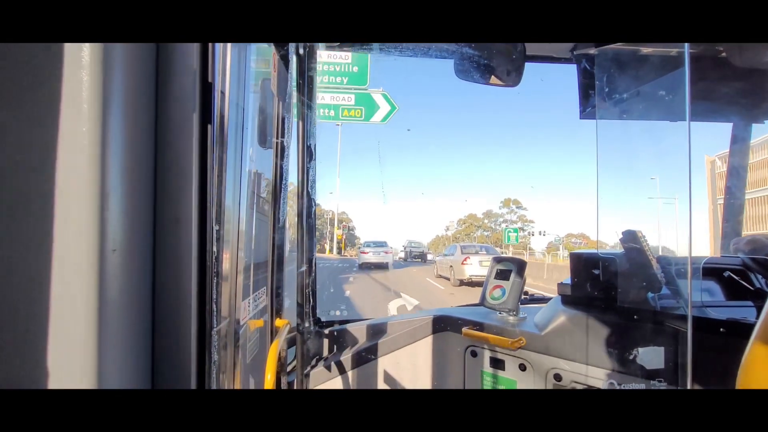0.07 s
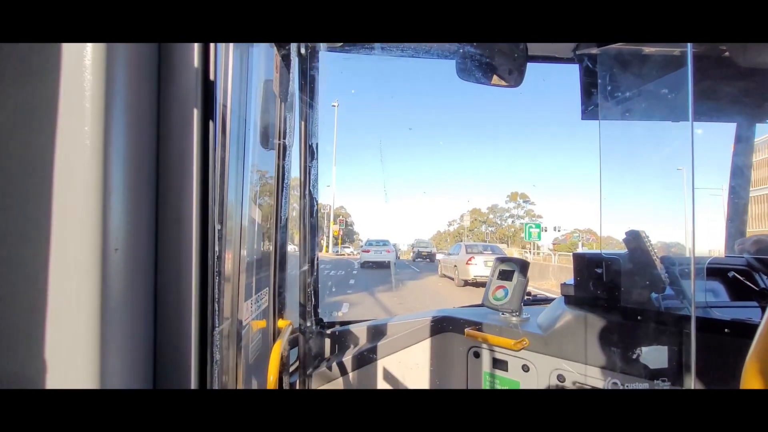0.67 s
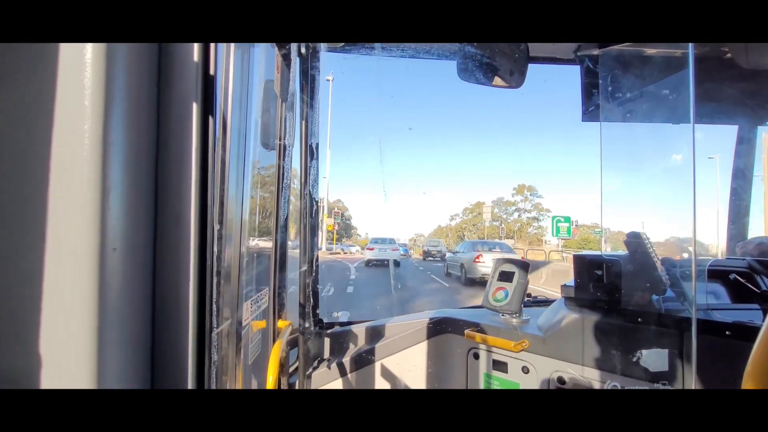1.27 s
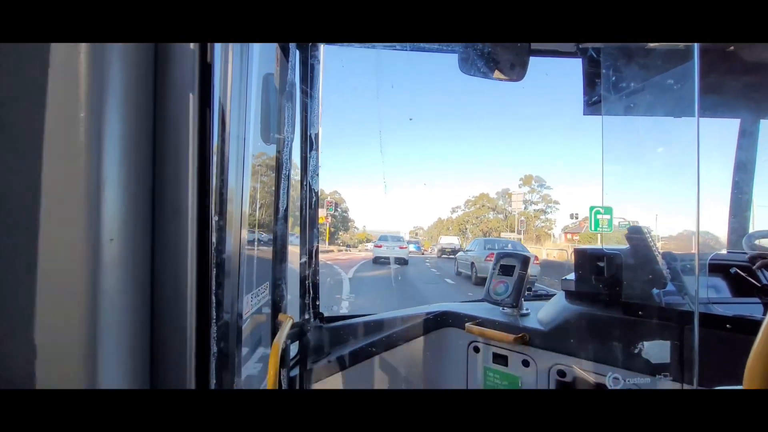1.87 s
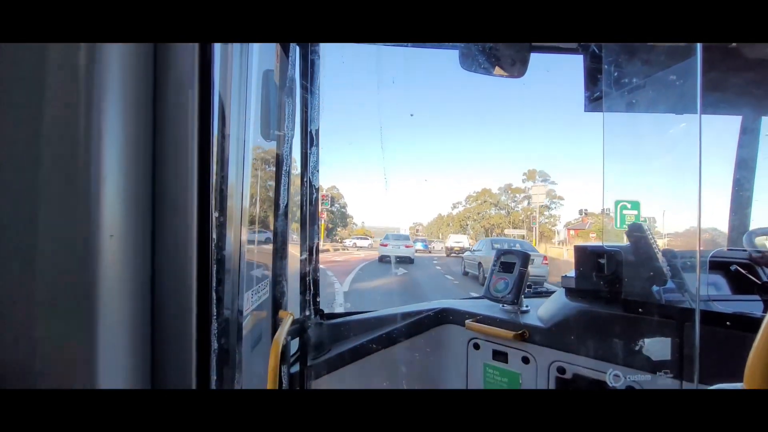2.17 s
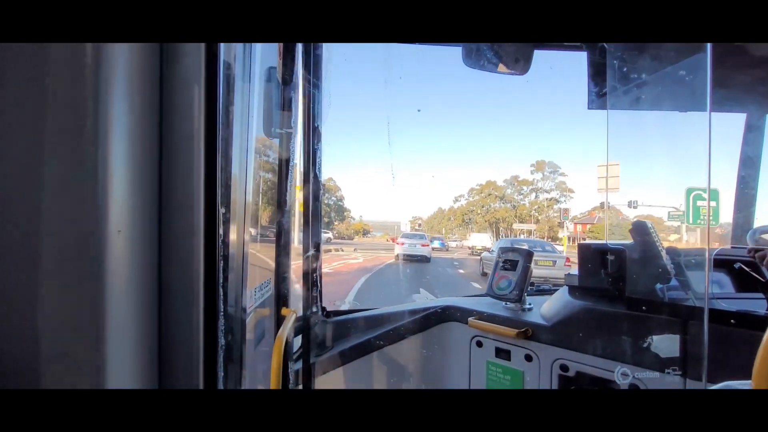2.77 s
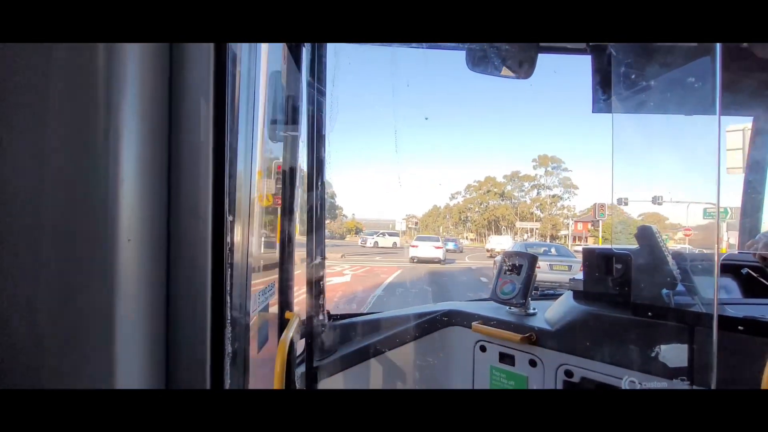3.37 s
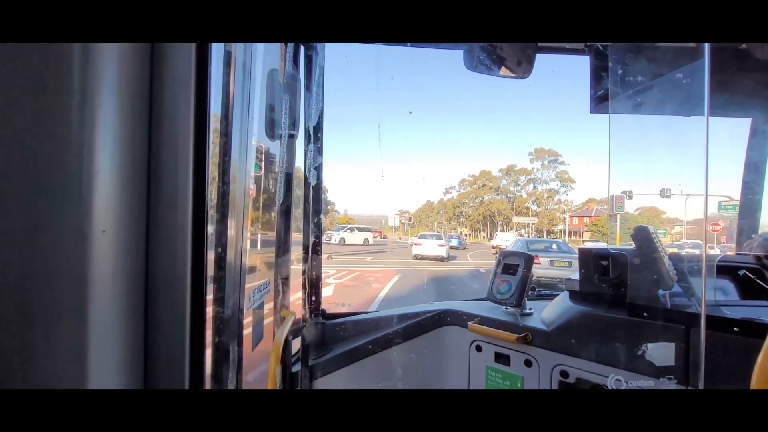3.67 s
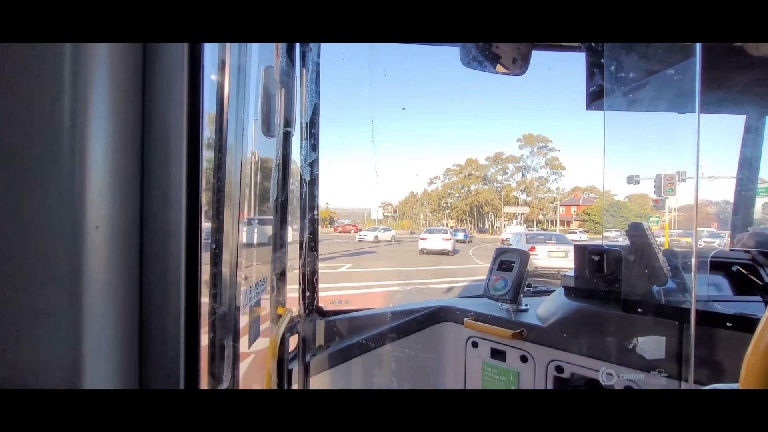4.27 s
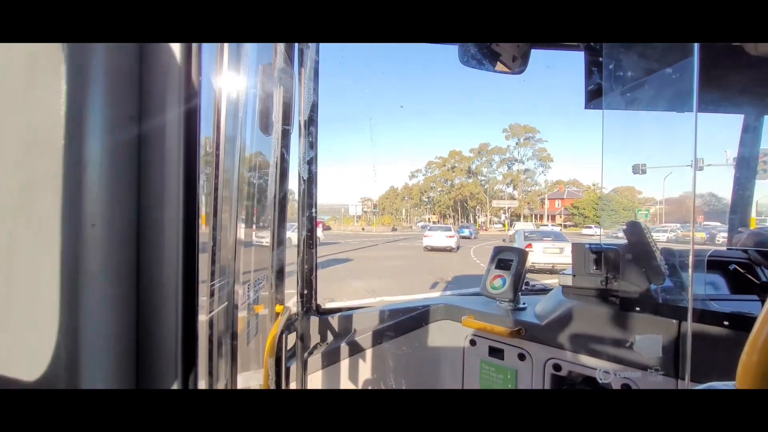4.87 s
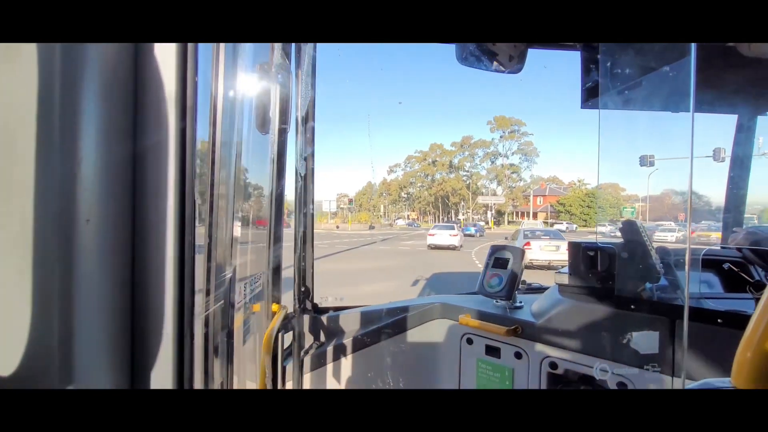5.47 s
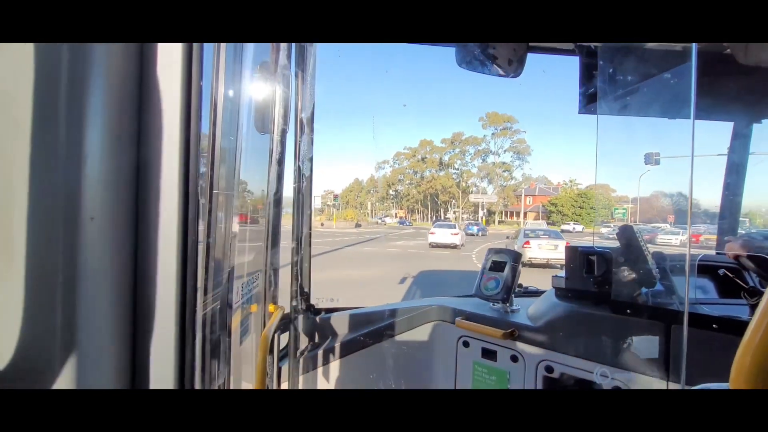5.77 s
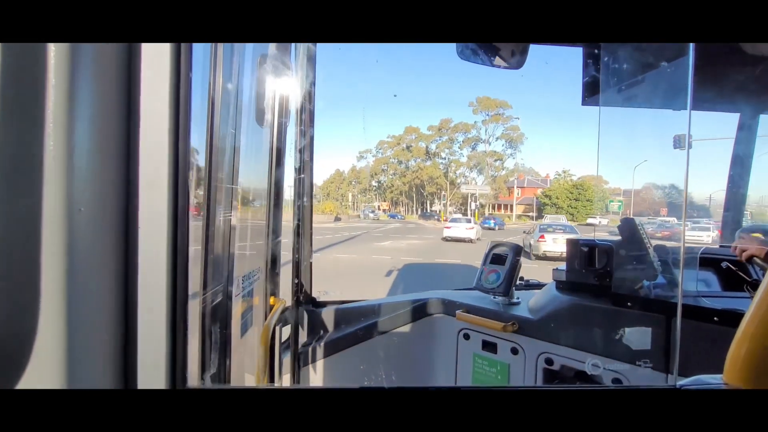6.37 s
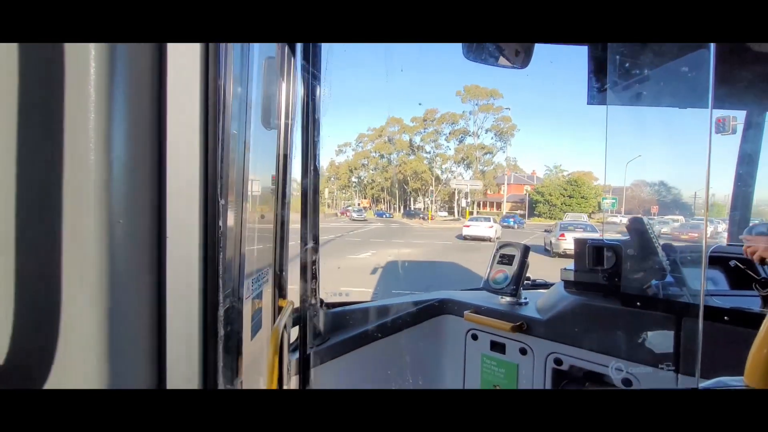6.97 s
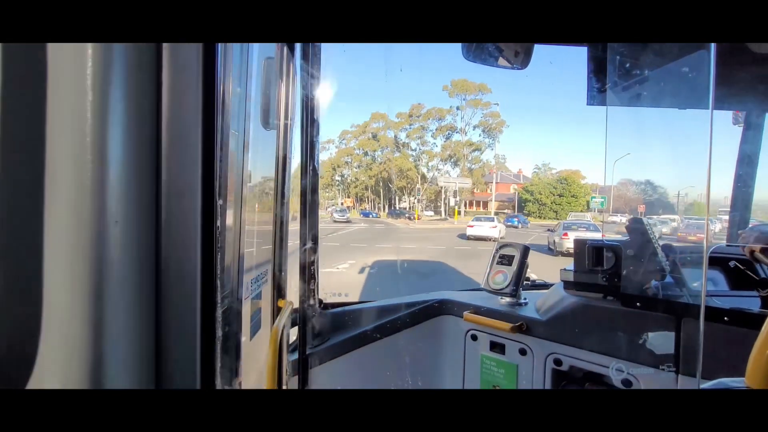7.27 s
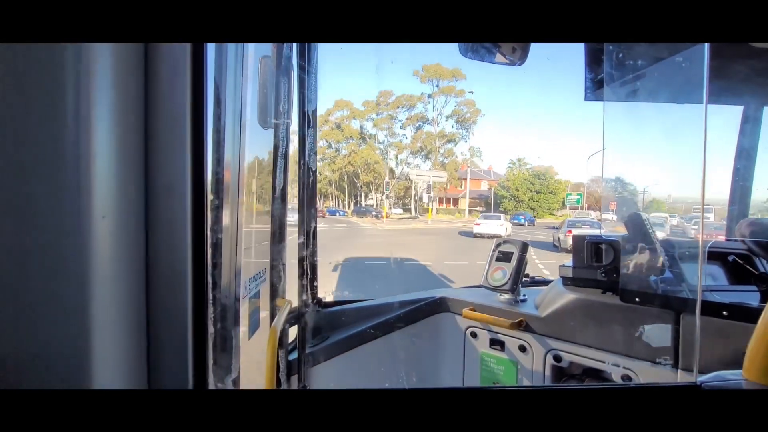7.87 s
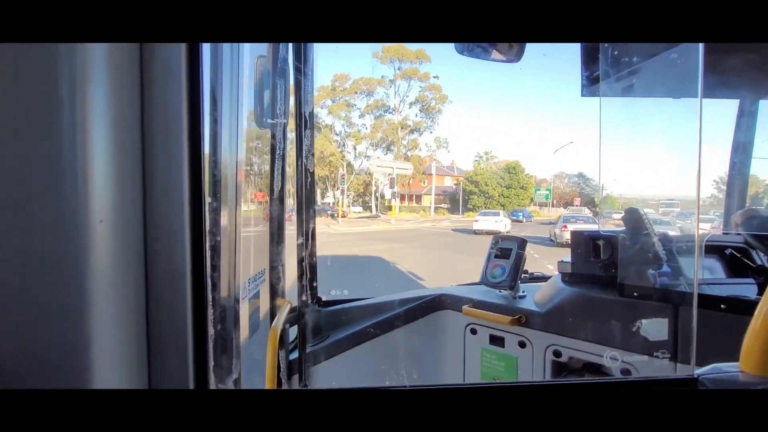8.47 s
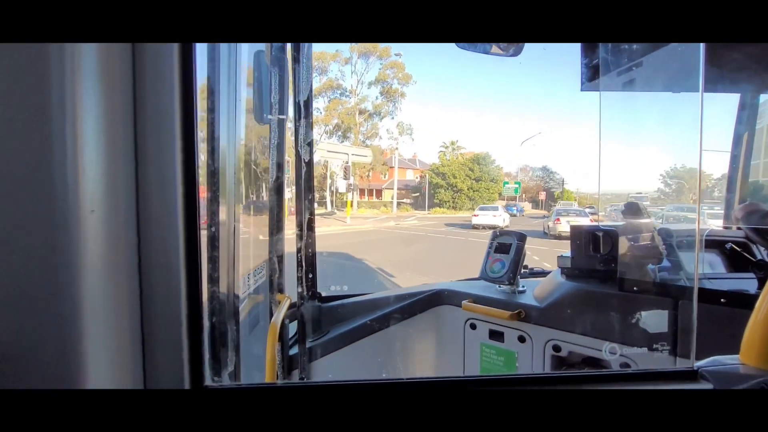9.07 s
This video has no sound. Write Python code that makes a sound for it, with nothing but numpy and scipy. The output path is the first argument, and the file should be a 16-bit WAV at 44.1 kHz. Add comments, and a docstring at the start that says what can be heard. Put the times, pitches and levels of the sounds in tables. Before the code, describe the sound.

A city bus is heard from its front seat in stereo for about nine seconds. A deep diesel drone and road rumble run throughout, with light gear whines and a faint fan hum. The engine drops in pitch during the first second or so, then sinks slowly, throbbing unevenly. A faint, high air hiss with a thin whistle fades over the first two seconds. Panels and fittings chatter lightly in flurries, and rubber seals give occasional tiny squeaks. Dull knocks and ticks come between 2.5 and 3.3 seconds. At 4 seconds, just after a low thump, the glazed door close by knocks sharply with a brief ring. At 5.8 seconds a jolt swells the rumble and a wall panel judders briefly. Thuds arrive around 7.9 seconds, and the door knocks again, slightly softer, at 8.5, followed by more thuds and rattling as the rumble continues.

```python
"""City bus, by the front door

Stereo microphone at the front seat, rolling through a junction. The diesel drones and throbs far behind,
its gears whining in step. The body thumps, and the road shakes it: rough patches swell the rumble and
set panels and fittings chattering. A wall panel judders; close by, the glazed door knocks sharply
twice. Seals squeak faintly, and at the start an air valve hisses away."""
import sys
import numpy as np
from scipy import signal
from scipy.fft import rfft, irfft, next_fast_len
from scipy.io import wavfile
from scipy.ndimage import uniform_filter1d, map_coordinates

SR = 44100
rng = np.random.default_rng(int(sys.argv[2]) if len(sys.argv) > 2 else 0)


def wav_out(sig):
    """Save sig, one row per channel (or a flat mono array), as 16-bit PCM at SR to the path in sys.argv[1]."""
    wavfile.write(sys.argv[1], SR, np.round(np.clip(np.atleast_2d(sig).T, -1, 1) * 32767).astype(np.int16))


N = 406602


def amp(db):
    """Decibels to gain."""
    return 10 ** (np.asarray(db) / 20)


def unit(x):
    """Scaled to rms 1."""
    return x / np.sqrt(np.mean(x ** 2) + 1e-20)


def along(points, hz):
    """Read (frequency, value) points on a log frequency axis."""
    freqs, values = np.transpose(points)
    return np.interp(np.log(hz + 1), np.log(freqs), values)


def curves(rows):
    """One value per sample for each column after the time."""
    times, *columns = np.transpose(rows)
    return [np.interp(np.arange(N) / SR, times, column) for column in columns]


def swells(rows, rise_s, fall_s):
    """Rows of (start, length, levels...) become one dB curve per level: each rises, holds and dies."""
    t = np.arange(N) / SR
    out = np.zeros((len(rows[0]) - 2, N))
    for start, length, *db in rows:
        rise = np.clip((t - start) / rise_s + .5, 0, 1)
        fall = np.exp(-np.maximum(t - start - length, 0) / fall_s)
        out += np.outer(db, rise * fall)
    return out


def wobble(rate):
    """A smooth random curve, rate knots a second."""
    return map_coordinates(rng.standard_normal(int(N * rate / SR) + 4), [np.arange(N) * rate / SR])


def filtered(x, response):
    """x through a complex response of frequency."""
    n = x.shape[-1]
    padded = next_fast_len(n + SR // 4)
    return irfft(rfft(x, padded) * response(np.fft.rfftfreq(padded, 1 / SR)), padded)[..., :n]


def add(track, start, sound):
    """Mix a sound into a track, start seconds in."""
    part = track[..., round(start * SR):][..., :sound.shape[-1]]
    part += sound[..., :part.shape[-1]]


def resonances(modes, hz):
    """Causal response of a part that rings in modes of f/Hz, width/Hz, level/dB."""
    return sum(amp(db) * 1j * hz * width / (centre ** 2 - hz ** 2 + 1j * hz * width)
               for centre, width, db in modes)


def contacts(rate, scatter_db):
    """Countless tiny collisions of uneven size, each a short stereo burst of noise."""
    energy = (rng.random(N) < rate / SR) * amp(scatter_db * rng.standard_normal(N)) ** 2
    decay = np.exp(-np.arange(SR // 20) / SR / 0.0088)
    envelope = np.sqrt(np.abs(signal.fftconvolve(energy, decay)[:N]))
    return unit(envelope * rng.standard_normal((2, N)))


def knock_noise(size, direct_share=0.39):
    """Noise of one contact: part of its power reaches both sides alike, the rest is scattered."""
    direct = np.sqrt(direct_share) * rng.standard_normal(size)
    return direct + np.sqrt(1 - direct_share) * rng.standard_normal((2, size))


def rasp(hz, scatter_hz, size, slips_per_s=1100):
    """A stereo tone whose pitch jumps with every slip: tight for a small scatter, hoarse for a wide one."""
    slips = np.arange(size) * slips_per_s / SR
    jumps = np.array([map_coordinates(rng.standard_normal(N // 20), [slips]) for _ in range(2)])
    return np.sqrt(2) * np.sin(2 * np.pi * np.cumsum(hz + scatter_hz * jumps, axis=1) / SR)


def tone(hz, db, flutter_db, drift_rad):
    """A rotating part's tone, unsteady in level and phase."""
    phase = 2 * np.pi * np.cumsum(hz * np.ones(N)) / SR + drift_rad * wobble(7.2)
    return np.sqrt(2) * amp(db + flutter_db * wobble(4.6)) * np.sin(phase)


# How alike the cabin's sound is at the two sides of the microphone: f/Hz, correlation
COHERENCE = [(60, 0.74), (130, 1), (290, 0.56), (640, 0.7), (1000, 0.15), (1500, -0.44), (2400, 0.092),
             (3500, -0.063), (7000, 0.014)]
def spread(pair, colour):
    """Two unrelated signals become a coloured cabin sound field of rms 1, nearly mono in the bass."""
    def mid_side(hz):
        angle = np.arccos(np.clip(along(COHERENCE, hz), -1, 1)) / 2
        return amp(along(colour, hz)) * np.array([np.cos(angle), np.sin(angle)])
    mid, side = filtered(pair, mid_side)
    return unit(np.array([mid + side, mid - side]))


# Decay of the passenger cabin: f/Hz, t60/s
CABIN_DECAY = [(200, 0.94), (2000, 0.22), (5000, 0.28), (12000, 0.12)]
def cabin(x):
    """The cabin's short reverberation, one tail for each side."""
    hz, t, spectrum = signal.stft(rng.standard_normal((2, SR // 2)), SR, nperseg=256)
    decay = amp(-60 * t / along(CABIN_DECAY, hz)[:, None])
    tail = signal.istft(spectrum * decay, SR, nperseg=256)[1]
    return signal.fftconvolve(x, tail / np.linalg.norm(tail[0]), axes=1)[:, :N]


# Bright spectrum of escaping air, shared by the buzzing trim: f/Hz, level/dB
SIZZLE_COLOUR = [(800, -50), (3000, -12), (6000, 0), (7300, 3), (8600, -3), (9900, 1.5), (12500, 1),
                 (15500, 0)]
def valve(whistle_hz=13500, hold_s=.4, sag_hz_per_s=2700):
    """Escaping air hisses and whistles thinly; the whistle sags and fades as the pressure drops."""
    t = np.arange(N) / SR
    hiss = amp(-56 - 9 * t) * spread(rng.standard_normal((2, N)), SIZZLE_COLOUR)
    emptying_s = np.maximum(t - hold_s, 0)
    pitch_hz = np.maximum(whistle_hz - sag_hz_per_s * emptying_s, whistle_hz / 2)
    return hiss + amp(-67.5 - 16 * emptying_s) * rasp(pitch_hz, scatter_hz=270, size=N)


# Rubber seals, faint at the seat: t/s, length/s, f/Hz, pitch scatter/Hz, level/dB
SEAL_RUBS = [(0.454, .12, 4300, 300, -53), (0.705, 0.062, 4250, 330, -52.5), (.87, 0.21, 6985, 350, -65),
             (1.05, 0.051, 4300, 260, -54), (1.186, 0.078, 4200, 272, -50), (1.22, .12, 5160, 500, -57),
             (1.929, .2, 4270, 220, -57), (2.14, 0.25, 5100, 480, -55.5), (2.42, .12, 2400, 260, -49.5),
             (2.6, .1, 4250, 300, -53), (3.09, 0.076, 4310, 300, -51), (3.89, 0.065, 10180, 330, -56),
             (4.717, .11, 4372, 250, -57), (5.368, 0.073, 4350, 280, -51), (6.39, .07, 13480, 400, -63),
             (7.148, .18, 7053, 400, -68), (7.293, 0.25, 4380, 219.9, -60.5),
             (8.245, 0.093, 4250, 250, -56)]
def squeaks():
    """Rubbing seals give short chirps, some tight and some hoarse, that stutter as they slip."""
    out = np.zeros((2, N))
    for start, length, hz, scatter_hz, db in SEAL_RUBS:
        n = int(length * SR)
        arch = np.sin(np.pi * np.arange(n) / n)
        add(out, start, amp(db) * rasp(hz, scatter_hz, size=n) * arch)
    return out * amp(2 * wobble(70))


# One loose fitting, dying down about four seconds in: t/s, level/dB
FITTING_LEVEL = [(0, -60), (2.7, -60), (3.5, -64), (4.2, -72)]
def fitting_buzz(firing_hz):
    """A loose fitting rings thinly, nudged by each firing of the engine."""
    nudge = 1 + .6 * np.sin(2 * np.pi * np.cumsum(firing_hz) / SR)
    level_db = curves(FITTING_LEVEL)[0] + 2 * wobble(15)
    return amp(level_db) * nudge * rasp(hz=2335, scatter_hz=85, size=N)


# Ventilation above the seat: f/Hz, level/dB
FAN_TONES = [(350, -52.5), (934, -61.5)]
def fan():
    """The spinning fan sings overhead, louder on the left."""
    hum = sum(tone(hz, db, flutter_db=3, drift_rad=0.81) for hz, db in FAN_TONES)
    return hum * amp([[0], [-7]])


# The diesel at the far end slows, then holds a low speed: t/s, firing rate/Hz, relative level/dB
ENGINE_RUN = [(0, 81.6, -40), (.25, 83.6, -36), (.5, 77, -43), (.8, 68.76, -23), (1.1, 63.04, -21.5),
              (1.6, 61.9, -29), (2.15, 60.56, -32), (2.55, 58.84, -15.5), (3, 58.33, -22),
              (3.5, 57.2, -20.5), (4.4, 55.36, -27), (5, 55.82, -20), (5.5, 56.13, -25), (6.05, 52, -22),
              (6.4, 49.38, -41), (7.3, 49.98, -29.5), (8.5, 50.64, -21), (9.22, 50.9, -41)]
def engine(firing_hz, drone_db):
    """The firing fundamental carries to the front of the bus, throbbing unevenly."""
    return tone(firing_hz, drone_db - 4, flutter_db=2, drift_rad=0.16)


# Whines heard through the body: start/s, end/s, multiple of the firing rate, relative level/dB
GEAR_WHINES = [(0, 1.7, 1.22, -30), (0, .35, 2.45, -34), (0, .35, 2.95, -32), (0, .55, 4.5, -32.5),
               (1.1, 2.5, 4.5, -33), (1.2, 2.4, 3.45, -35), (1.48, 1.65, 4.5, -36), (2.08, 2.26, 4.5, -31),
               (1.1, 3.3, 9, -49), (3.2, 5.5, 4.53, -37), (3.7, 5.7, 5, -38), (4.2, 5.2, 6.33, -46),
               (5.9, 8.9, 7.43, -37.5), (6.3, 9.22, 11.23, -45.5), (7.7, 9.22, 8.86, -40),
               (8.8, 9.22, 7.5, -41)]
def driveline(firing_hz):
    """Shaft and gear tones, locked to the engine's speed, each swell and fade."""
    out = np.zeros(N)
    firing_phase = 2 * np.pi * np.cumsum(firing_hz) / SR + .05 * wobble(14)
    for start, end, multiple, db in GEAR_WHINES:
        phase = multiple * firing_phase[round(start * SR):round(end * SR)]
        add(out, start, amp(db) * signal.windows.tukey(len(phase), .5) * np.sin(phase))
    flutter_db = 3.5 * wobble(14)
    return out * amp(flutter_db - 1.5)


# Shaking of the body, above that on the smoothest stretch: t/s, level/dB
ROAD_SHAKE = [(0, 7), (.9, 4), (1.65, 2.5), (2.3, 4), (2.75, 3.5), (3.05, 3), (3.55, 1.5), (4.5, 0),
              (5.25, 0), (5.8, 9.5), (6.15, 3.5), (7, 0.26), (7.7, 1.5), (8.15, 3.5), (8.6, 5.5), (8.95, 1),
              (9.22, 1.5)]
# What rough patches add: t/s, length/s, shake/dB, boom/dB, floor rumble/dB, tyre roar/dB
ROUGH_PATCHES = [(.08, 0.18, 0.5, -0.5, 1, -1), (1.17, 0.1, 3, 1.5, -0.5, -0.5),
                 (1.93, 0.25, 0.5, 0.5, 2, 1), (2.56, 0.21, 0.5, 0, 1.5, 2.5), (3.12, .13, 7.5, -6, 0, -1),
                 (3.88, 0.17, 4.5, -2, -1, 0.5), (4.76, 0.15, 1, 3.5, -1, 1),
                 (5.76, 0.089, -1, 1, 1.5, -0.5), (6.42, 0.18, 1, 4, 1, 0), (7.86, 0.18, -0.5, 4, 5.5, 3.5),
                 (8.14, 0.03, 4.5, -12, 0, 2), (8.38, 0.17, 4, 1.5, -2.5, 0), (8.67, .075, 2, 0, 0, 1.5),
                 (9.11, 0.11, 2.5, 7.5, 0.5, 1.5)]
def road_surface():
    """The road shakes the body; each rough patch adds a swell and shifts the balance of the rumble."""
    patch_db, boom_db, floor_db, roar_db = swells(ROUGH_PATCHES, rise_s=0.11, fall_s=0.034)
    return curves(ROAD_SHAKE)[0] + patch_db, boom_db, floor_db, roar_db


def rumble(colour, evenness):
    """Road noise through the body; damping by the suspension evens out its swells."""
    noise = spread(rng.standard_normal((2, N)), colour)
    power = np.abs(uniform_filter1d(np.mean(noise ** 2, axis=0), SR // 8)) + 1e-6
    return unit(noise / power ** (evenness / 2))


# Spectra at the seat of body sway, cabin boom, floor and tyres: f/Hz, level/dB
BODY_SWAY = [(8, -46), (24, -2), (33, 0), (42, 4), (52, -36), (80, -44), (300, -120)]
AIR_BOOM = [(15, -70), (38, -25.5), (52, 2.5), (66, 9.5), (80, 2.5), (95, 0), (120, -14), (170, -50),
            (600, -120)]
FLOOR_RUMBLE = [(30, -63), (80, -6), (122, 3.5), (158, 1), (187, -4), (218, -1), (285, -3), (325, -12),
                (380, -18), (600, -39), (2000, -120)]
TYRE_ROAR = [(80, -68), (260, -24), (355, 5.5), (400, -2.5), (450, -1), (510, -8), (640, -5), (800, -8),
             (1000, -14), (1350, -15.5), (2000, -28.5), (9000, -120)]
def road_noise(shake_db, boom_db, floor_db, roar_db):
    """The body sways, the air booms, the floor rumbles and the tyres roar, all growing with the shake."""
    sway = amp(-33 + 0.5 * shake_db) * rumble(BODY_SWAY, evenness=0.62)
    boom = amp(-28.5 + 0.85 * shake_db + boom_db) * rumble(AIR_BOOM, evenness=0.47)
    floor = amp(-31 + 0.9 * shake_db + floor_db) * rumble(FLOOR_RUMBLE, evenness=0.3)
    roar = amp(-40.5 + 0.95 * shake_db + roar_db) * rumble(TYRE_ROAR, evenness=0.14)
    return sway + boom + floor + roar


# Short low swells that fill the cabin: t/s, level/dB, f/Hz, rise/s
LOW_THROBS = [(0.42, -21.5, 35.5, 0.24), (1.511, -18, 65.9, 0.054), (1.646, -14, 64.6, 0.046),
              (1.934, -12.5, 64.5, 0.053), (2.293, -17, 64.46, .05), (2.566, -15, 62.7, .05),
              (2.65, -21.5, 35, 0.1), (2.885, -25, 65.6, 0.045), (3.122, -18, 63, 0.039),
              (3.13, -17, 37, 0.058), (3.315, -11, 60.05, .05), (3.441, -15, 61.33, 0.04),
              (3.838, -8.5, 62, 0.039), (5.17, -16, 60.56, 0.044), (5.322, -16, 59.3, 0.06),
              (5.469, -14, 62.3, 0.037), (5.827, -17, 67, .05), (7.868, -11.5, 68.3, 0.032),
              (8.256, -14.5, 64, 0.026), (8.404, -10.5, 65.8, 0.035), (8.501, -17, 64.5, 0.046),
              (9.07, -21.5, 34.74, 0.095), (9.095, -13.5, 66, 0.047)]
def throbs():
    """The engine's drone throbs and the body thumps: each low tone swells and dies within a few cycles."""
    out, t = np.zeros(N), np.arange(SR) / SR
    for start, db, hz, rise_s in LOW_THROBS:
        swell = (t / rise_s * np.exp(1 - t / rise_s)) ** 4
        add(out, start, amp(db) * swell * np.sin(2 * np.pi * hz * t))
    return out


# Spectrum of the panels all around the microphone: f/Hz, level/dB
PANEL_COLOUR = [(200, -62), (1150, 8.5), (1550, 2.5), (2000, 6), (2350, 4), (2700, 1), (3500, -1),
                (4400, -2.5), (5300, -8), (6200, -12), (7400, -18), (8600, -30), (15000, -70)]
# Modes of rails and brackets: f/Hz, width/Hz, level/dB
FITTING_MODES = [(1720, 50, 2), (1870, 60, 4), (1985, 40, 8), (2330, 70, 4), (2715, 60, -3), (3059, 30, 0),
                 (3834, 80, -2), (4170, 40, 3), (4320, 60, 0), (4600, 50, -2), (5576, 100, -8)]
# Loose parts break into a rattle, or settle: t/s, length/s, added panel level/dB, added trim level/dB
RATTLE_SPELLS = [(2.04, .05, 0, 2), (2.2, 0.27, 0, -2.5), (2.66, 0.056, 3, 5), (3.135, .025, -2.5, 3),
                 (3.18, .02, -2, -2), (3.235, 0.025, 7, 5), (3.64, 0.17, 2, 4), (3.9, 0.14, 5.5, 11.5),
                 (3.98, 0.077, 3.5, 3.5), (4.1, 0.067, 5, 0.5), (4.76, .06, 1, 2.5), (5.5, 0.17, -0.5, 2),
                 (5.95, 0.24, 1.5, 4), (6.39, 0.052, 0, 11), (6.61, 0.056, 1.5, 3), (6.74, 0.068, 1.5, 2.5),
                 (6.9, .8, -3, -1), (7.06, 0.027, 5, 6), (8.12, 0.05, -3.5, 5), (8.46, 0.099, 3, 8.5),
                 (8.63, 0.22, 2.5, 5.5), (9.13, .03, 0.5, 8)]
def chatter(shake_db):
    """Panels chatter in flurries as the body shakes, ringing the fittings; light trim buzzes on top."""
    panel_db, trim_db = swells(RATTLE_SPELLS, rise_s=0.07, fall_s=0.053)
    flurry_db = shake_db + 1.6 * wobble(33)
    ringing = unit(filtered(contacts(rate=720, scatter_db=8), lambda hz: resonances(FITTING_MODES, hz)))
    panels = spread(contacts(rate=2000, scatter_db=-1), PANEL_COLOUR) + amp(-11) * ringing
    trim = spread(contacts(rate=700, scatter_db=3.5), SIZZLE_COLOUR)
    panels *= amp(-50.5 + 0.91 * flurry_db + panel_db)
    trim *= amp(-69 + 0.79 * flurry_db + trim_db)
    return panels + trim


# Single knocks around the cabin: t/s, level/dB, f/Hz, t60/s
LOOSE_TAPS = [(2.559, -29, 690, 0.025), (2.64, -23, 450, 0.074), (2.785, -27, 635, 0.031),
              (3.099, -27.5, 710, 0.04), (3.136, -45, 10500, .015), (3.148, -40, 5000, .035),
              (3.149, -44, 14000, .07), (3.153, -17, 405, 0.056), (3.226, -31.5, 4070, .08),
              (3.233, -41, 11700, .035), (3.249, -31, 2200, .06), (4.445, -48, 6600, .05),
              (5.358, -30, 760, 0.035), (5.515, -49, 8000, 0.042), (5.792, -34.5, 4440, 0.065),
              (6.162, -33, 4797, 0.01), (6.629, -52, 6040, .03), (7.648, -47, 6450, .03),
              (7.862, -17, 380, 0.085), (7.915, -17.5, 360, 0.091), (7.967, -21.5, 639.5, 0.028),
              (8.52, -31, 2900, 0.14), (8.535, -15, 320, 0.13), (8.672, -20.5, 290, .06),
              (8.709, -24, 690, 0.06), (8.738, -20, 440, 0.053)]
def taps(relative_width=0.66):
    """Panels and fittings thud or tick against their mounts, each with its own broad ring."""
    out, t = np.zeros((2, N)), np.arange(SR // 8) / SR
    for start, db, pitch, t60 in LOOSE_TAPS:
        burst = knock_noise(len(t)) * amp(-60 * t / t60)
        ring = filtered(burst, lambda hz: resonances([(pitch, relative_width * pitch, 0)], hz) ** 2)
        add(out, start, amp(db) * ring / np.max(np.abs(ring)))
    return out + amp(-5) * cabin(out)


# Modes of a big wall panel: f/Hz, width/Hz, level/dB
WALL_MODES = [(350, 80, 4), (680, 110, -1), (1700, 60, -13), (1880, 60, -8), (1990, 40, -7)]
# Colour its mounts give to the blows: f/Hz, level/dB
WALL_MOUNTS = [(150, -20), (330, 6), (2200, -3.5), (4000, -13)]
def judder(start_s=5.8, rise_s=.008, hold_s=.045, t60=.17):
    """A hard jolt sets a wall panel hammering on its mounts for a moment, ringing its modes."""
    blows = contacts(rate=2500, scatter_db=3)
    ring = unit(filtered(blows, lambda hz: resonances(WALL_MODES, hz) * amp(along(WALL_MOUNTS, hz))))
    t = np.arange(N) / SR - start_s
    envelope = np.clip(t / rise_s, 0, 1) * amp(-60 * np.maximum(t - hold_s, 0) / t60)
    return amp(-23.5) * envelope * ring


# Modes of the door's pane and frame: f/Hz, level/dB, t60/s, left over right/dB
PANE_MODES = [(1465, -17, .06, 0), (1750, -17, .04, 0), (1985, -13, .08, -9), (2335, -22, .07, -4),
              (2715, -18, .06, -4), (3050, -19, .035, 0), (3520, -14.5, .03, 4), (3840, -17.5, .055, -4),
              (4220, -19, .03, -6), (4480, -21, .07, 0), (5500, -17, .03, 4), (6150, -16, .016, -10),
              (13300, -27, .03, 6)]
def pane_ring(t, scatter_cycles=0.31):
    """Struck glass and frame ring briefly; each mode reaches the two sides at a different phase."""
    ring = np.zeros((2, len(t)))
    for hz, db, t60, pan_db in PANE_MODES:
        envelope = amp(db - 60 * t / t60 + np.array([[pan_db], [-pan_db]]) / 2)
        cycles = hz * t + rng.random() + scatter_cycles * rng.random((2, 1))
        ring += envelope * np.sin(2 * np.pi * cycles)
    return ring


# Strength of the bending waves in the pane: f/Hz, level/dB
BENDING_COLOUR = [(700, -70), (1400, -7), (2000, 0), (4500, -2), (8000, -25)]
def pane_chirp(t, top_hz=5900, sweep_s=.012):
    """A falling chirp: low bending waves cross the pane more slowly than high ones."""
    hz = top_hz / (1 + t / sweep_s) ** 2
    scatter_rad = np.array([wobble(1200)[:len(t)] for _ in range(2)])
    return np.sin(2 * np.pi * np.cumsum(hz) / SR + scatter_rad) * amp(along(BENDING_COLOUR, hz))


# Spectra of a knock's body and of its top-end snap: f/Hz, level/dB
KNOCK_COLOUR = [(200, -45), (700, -6), (1450, 1), (1800, 1), (2700, -1), (3700, 3.5), (5200, 3), (6200, -5),
                (7500, -24), (15000, -31)]
SNAP_COLOUR = [(1000, -70), (4000, -22), (6300, -4), (7300, -8), (8700, -8), (9800, 3), (15000, 0)]
# The front door, close to the microphone: t/s, body and ring level/dB, snap level/dB
DOOR_KNOCKS = [(3.9998, -12.5, -26), (8.4758, -18, -30.5)]
def door(impact_t60=.007, crack_t60=.024):
    """The glazed door hits its frame: a hard snap, a falling chirp and a brief ring."""
    out, t = np.zeros((2, N)), np.arange(SR // 4) / SR
    blow = amp(-60 * t / impact_t60) + amp(-6 - 60 * t / crack_t60)
    for start, db, snap_db in DOOR_KNOCKS:
        crack = knock_noise(len(t)) * blow
        body = filtered(crack, lambda hz: amp(along(KNOCK_COLOUR, hz)))
        snap = filtered(crack, lambda hz: amp(along(SNAP_COLOUR, hz)))
        chirp = amp(-27.5) * pane_chirp(t)
        add(out, start, amp(db) * (body + pane_ring(t)) + chirp + amp(snap_db) * snap)
    return out + amp(-14) * cabin(out)


def scene():
    """From the front seat: engine speed tunes drone and whines, the road drives rumble and chatter."""
    firing_hz, drone_db = curves(ENGINE_RUN)
    shake_db, boom_db, floor_db, roar_db = road_surface()
    machinery = engine(firing_hz, drone_db) + fan() + driveline(firing_hz) + fitting_buzz(firing_hz)
    rolling = road_noise(shake_db, boom_db, floor_db, roar_db)
    bodywork = chatter(shake_db) + door() + judder() + taps() + squeaks()
    return machinery + throbs() + rolling + bodywork + valve()


# Response of the microphone's two ports: f/Hz, level/dB
MIC_LEFT = [(40, -1), (110, -.2), (170, .5), (290, 0), (480, -2), (700, 0), (2400, -.8), (5500, -.8),
            (7500, 2.5), (12000, 3)]
MIC_RIGHT = [(40, 1), (110, .2), (170, -.5), (290, 0), (480, 1.5), (700, .3), (2400, 1), (5800, 1),
             (7700, -6), (9500, -4.5), (14000, -14)]
def record(dry, top_hz=15780):
    """The two microphone ports differ in colour, the right one being dull; the band ends steeply."""
    edge = SR // 10
    padded = np.pad(dry, ((0, 0), (edge, edge)), mode="reflect", reflect_type="odd")
    ports = lambda hz: amp([along(MIC_LEFT, hz), along(MIC_RIGHT, hz)]) * (hz < top_hz)
    return filtered(padded, ports)[:, edge:edge + N]


dry = scene()
out = record(dry)
wav_out(out)
```